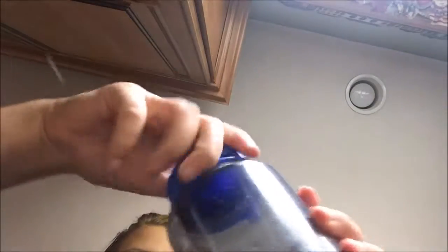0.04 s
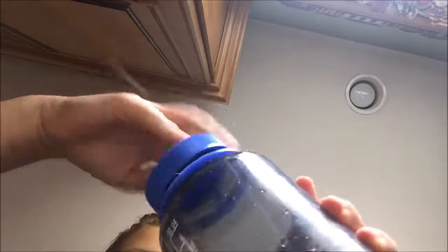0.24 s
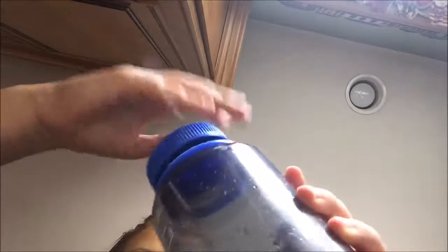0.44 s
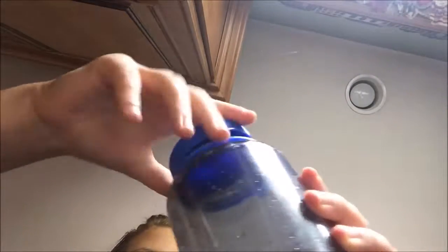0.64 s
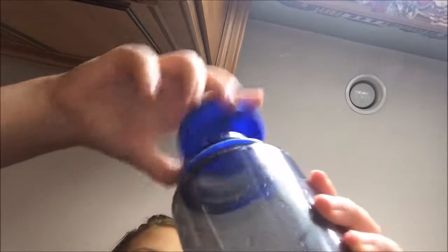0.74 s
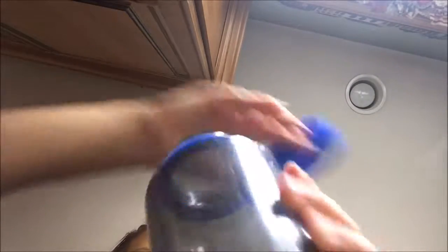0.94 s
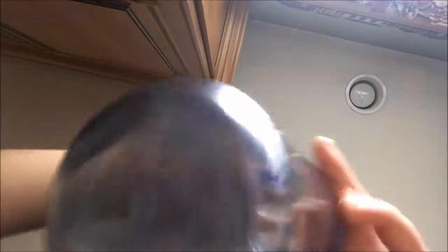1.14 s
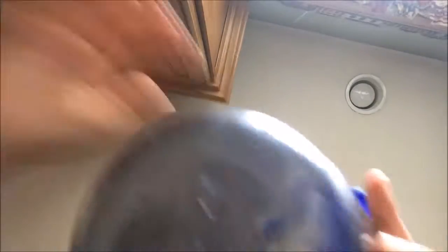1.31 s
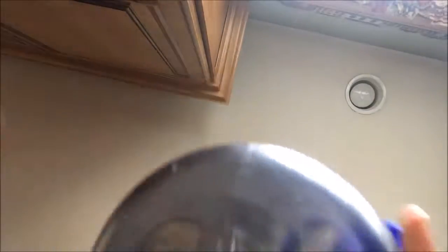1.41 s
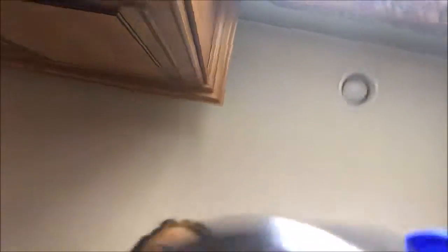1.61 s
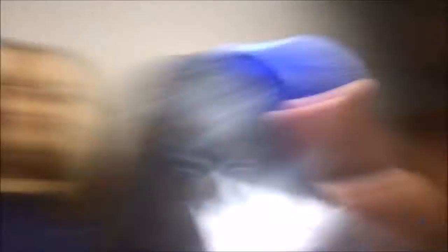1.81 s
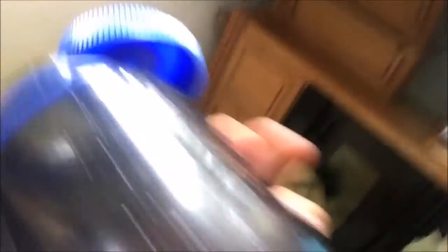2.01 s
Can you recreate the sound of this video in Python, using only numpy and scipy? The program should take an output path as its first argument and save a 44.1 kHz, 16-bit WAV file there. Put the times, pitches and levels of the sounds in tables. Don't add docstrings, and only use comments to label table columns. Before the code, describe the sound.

Close up in a small indoor kitchen, a bottle cap clicks and scrapes along its thread, snaps free, ticks lightly, knocks the bottle wall with a hollow hum, then the recording phone is bumped and dragged.

```python
import sys
import numpy as np
from scipy import signal
from scipy.fft import rfft, irfft, next_fast_len
from scipy.io import wavfile
from scipy.ndimage import uniform_filter1d

SR = 44100
rng = np.random.default_rng(int(sys.argv[2]) if len(sys.argv) > 2 else 0)


def generate_wav(sig):
    pcm = np.round(np.clip(np.atleast_2d(sig).T, -1, 1) * 32767).astype(np.int16)
    wavfile.write(sys.argv[1], SR, pcm)


def attenuation_scalar(level_db):
    decades = np.asarray(level_db, float) / 20
    return 10 ** decades


N = 90449

# (frequency [Hz], level [dB])
AIR_COLOUR = [(30, -19), (70, 10.5), (110, 4.5), (300, 6.5), (700, -2), (2000, -10.5), (6000, -20),
              (16000, -28)]
# (time [s], level [dB])
SCRAPE = [(0, -44.5), (.1, -55.5), (.2, -48), (.27, -45), (.31, -55), (.35, -51), (.41, -50.5), (.45, -59),
          (.5, -47), (.55, -61), (.6, -83.5), (.655, -54), (.665, -39), (.72, -56.5), (.775, -49),
          (.79, -49.5), (.81, -51), (.86, -61.5), (.95, -69)]
# (frequency [Hz], level [dB])
SCRAPE_COLOUR = [(300, -26), (600, -4), (1500, -1.5), (2800, -1), (4000, -25), (6500, -15.5), (10000, -38),
                 (16000, -27.5)]
# (time [s], peak level [dB], struck region [Hz], crack over peak [dB], bottle boom over peak [dB])
TWIST = [(0.023, -23, 2050, -17, -17.5), (0.0312, -35, 2500, -7, -27), (0.0335, -12.5, 1700, -7, -9.5),
         (0.043, -27.5, 4400, -23.5, -51), (0.106, -30.5, 1700, -2, -11), (0.11, -25, 2500, -7, -3),
         (0.122, -24.5, 2300, -21, -40), (0.149, -28.5, 2050, -14, -8), (0.157, -27.5, 6760, -11, -10),
         (0.161, -33.5, 1510, -23, -2), (0.232, -30, 1830, -15.5, -46), (0.236, -20, 1610, -18, -2),
         (0.307, -38.5, 2080, -12.5, -18), (0.321, -34.5, 2800, -8.5, -15), (0.331, -33.5, 1400, -22, -2),
         (0.352, -35, 1420, -12, -22), (0.366, -25, 1470, -34, 2), (0.381, -21.5, 2800, -45.5, -10),
         (0.384, -15.5, 1900, -48, -6), (0.391, -37, 2500, -35, -10.5), (0.401, -16, 1690, -37.5, -9),
         (0.407, -48, 900, -42, -17.5), (0.413, -29, 1375, -49, -10), (0.431, -29.5, 1400, -14.5, -1.5),
         (0.458, -25, 1970, -12, -11), (0.4925, -28.5, 1900, -34, -17), (0.531, -42, 2500, -23.5, -25.5)]
# (frequency [Hz], level [dB], t60 [s])
CAP = [(1035, 3.5, 0.15), (1499, 8, 0.072), (1821, 6.5, 0.04), (2090, 9, 0.026), (2511, 1, 0.081),
       (2636, -14, 0.2), (3613, -9, 0.11), (4220, -1.5, 0.053), (4580, -1, 0.038), (5710, 1, 0.017),
       (6270, -10.5, 0.066), (6290, 4, 0.012)]
# (frequency [Hz], level [dB], t60 [s])
SHUT = [(136, -0.5, 0.084), (200, 11, 0.049), (265, 8.5, 0.021), (317, 2.5, 0.062), (460, -5, 0.026)]
# (frequency [Hz], level [dB])
CRACK = [(1500, -36), (4000, 6.5), (7000, 1.5), (11000, -4.5), (16000, -8.5)]
# (time [s], level [dB])
GRIP = [(.1, -51), (.16, -84), (.172, -32.5), (.19, -58), (.3, -47), (.36, -43), (.42, -30.5), (.46, -44.5),
        (.5, -37.5), (.54, -37), (.58, -53.5), (.65, -61), (.695, -26.5), (.72, -59)]
# (time [s], level [dB])
PALM = [(.29, -66), (.305, -59), (.35, -63.5), (.37, -88)]
# (frequency [Hz], level [dB])
PALM_COLOUR = [(4000, -22), (6500, 5.5), (9000, -12.5), (11200, 1), (13000, -10), (16000, -1)]
# (time [s], level [dB])
SLACK = [(.5, -51), (.58, -46), (.63, -47.5), (.665, -40.5)]
# (time [s], peak level [dB], struck region [Hz], crack over peak [dB], bottle boom over peak [dB])
LOOSE = [
    (.666, -5, 1740, -8, -9),
    (.675, -12.5, 2100, -27.5, -42),
    (.687, -16, 1920, -25, -16.5),
    (.749, -30, 1590, -9.5, -9),
    (.777, -32.5, 2090, -39, -4),
    (.795, -23.5, 1590, -6.5, -9.5),
]
# (time [s], level [dB], rise [s], t60 [s], share by which the note starts flat [ratio])
HUM = [
    (.795, -28, 0.029, 0.25, 0.16),
    (1.073, -39, 0.012, 0.13, 0.03),
    (1.49, -33.5, 0.0029, 0.14, 0),
    (1.576, -41, 0.002, 0.17, 0),
    (1.957, -47.5, 0.0021, 0.17, 0),
    (2.021, -30, 0.031, 0.49, 0.00079),
]
# (time [s], peak level [dB], struck region [Hz], crack over peak [dB], bottle boom over peak [dB])
STRAP = [(.975, -49.5, 6360, -60, -42), (1.026, -34, 2350, -2, -14), (1.0265, -32, 6400, -20, -33),
         (1.039, -31, 1800, -8.5, -9), (1.0395, -28, 4000, -32, -50), (1.158, -46.5, 1810, -39, -24),
         (1.175, -53.5, 1900, -44, -20), (1.231, -35, 1880, -42, -45), (1.243, -40, 2450, -15, -40),
         (1.279, -39, 1590, -5, -4), (1.2795, -32.5, 4100, -17.5, -40), (1.609, -58.5, 2500, -6, -6)]
# (frequency [Hz], level [dB], t60 [s])
LID = [(1634, 9, 0.038), (1960, -0.5, 0.069), (2100, 5.5, 0.042), (2464, -0.5, 0.15), (2770, 2, 0.07),
       (3300, 13, 0.013), (3994, 4.5, 0.025), (4680, 1, 0.042), (6170, -1, .04), (7400, -39, 0.02)]
# (time [s], peak level [dB], struck region [Hz], crack over peak [dB], cavity boom over peak [dB])
BOUNCES = [
    (1.3395, -8, 1500, -32.5, -9),
    (1.3585, -27.5, 1840, -44.5, -29.5),
    (1.387, -22.5, 1380, -34, -25),
    (1.436, -37, 1500, -50, -40),
    (1.491, -40, 1050, -53.5, 6),
    (1.51, -62, 1500, -47, 5),
]
# (frequency [Hz], level [dB], t60 [s])
WALL = [(955.7, 9.5, 0.066), (1500, -10.5, 0.06), (1777, -1.5, 0.065), (1950, 2.5, 0.026),
        (1965, -3.5, 0.05), (2500, 0, 0.029), (2600, -3.5, .05), (2890, -23, 0.011), (2850, -8.5, 0.07),
        (3070, -15, 0.032), (3320, -6.5, 0.039), (3680, -7, 0.028)]
# (frequency [Hz], level [dB], t60 [s])
OPEN = [(289.3, 26, 0.43), (364, 15, 0.06)]
# (time [s], level [dB])
BRUSH = [(1.61, -58), (1.635, -65.5), (1.655, -53), (1.685, -62)]
# (frequency [Hz], level [dB])
BRUSH_COLOUR = [(600, 13), (2000, -0.5), (4300, 0.5), (7000, -9.5), (13000, -9), (16000, -11)]
# (time [s], level [dB])
RUMBLE = [(1.63, -62), (1.66, -46), (1.7, -44), (1.78, -47), (1.85, -45), (1.91, -54), (1.96, -63)]
# (frequency [Hz], level [dB])
RUMBLE_COLOUR = [(25, -18), (50, -11), (82, 1.5), (140, -10), (400, -17), (1500, -43), (3000, -72)]
# (time [s], peak level [dB], frequency [Hz], t60 [s])
THUMPS = [
    (1.657, -45, 980, 0.019),
    (1.676, -44.5, 900, 0.021),
    (1.69, -23, 79.6, 0.15),
    (1.696, -51, 690, 0.0089),
    (1.7312, -23.5, 524, 0.035),
    (1.734, -34.5, 926, 0.017),
    (1.735, -6, 161.8, 0.029),
    (1.795, -38, 94, 0.13),
    (1.839, -20.5, 181.5, 0.088),
    (1.866, -21, 183, 0.021),
]
# (time [s], level [dB])
DRAG = [(1.836, -32.5), (1.845, -39), (1.856, -29.5), (1.868, -27.5), (1.875, -33.5), (1.879, -43),
        (1.912, -49.5), (1.93, -69)]
# (time [s], peak level [dB])
CATCHES = [(1.8365, -16), (1.8405, -35), (1.8438, -13.5), (1.8471, -12), (1.85, -15.5), (1.858, -31),
           (1.862, -18.5), (1.8655, -13.5), (1.8725, -15.5)]
# (frequency [Hz], width [Hz], level [dB])
CASE = [(183, 98, 13.5), (605, 107, 17), (912, 115, 8.5), (1110, 154, 4), (2300, 1600, -11)]
# (time [s], peak level [dB])
TICKS = [(1.891, -44.5), (1.901, -44), (1.905, -46.5), (1.914, -55.5)]
# (frequency [Hz], t60 [s])
KITCHEN = [(200, 0.2), (2000, 0.35), (8000, 0.23), (15000, 0.36)]

AIR_DB, ROOM_DB = -62, -14.5
GRAINS_PER_S, GRAIN_DB, HISS_SHARE = 600, 3.5, 0.7
CONTACT_S, ROUGH_DB = 0.00202, -14.5
SNAP_CYCLES = 9.04
SPREAD_DB = 2
BODY_RISE_S, CRACK_T60 = 0.00026, 0.0058
SLACK_HZ = 118
CAVITY_HZ, SETTLE_S = 296, 0.03
SLIPS_PER_S, SLIP_DB = 1500, 2
WALL_TOP_HZ, CASE_TOP_HZ = 3950, 4770
MIC_LOW_HZ, MIC_TOP_HZ = 94, 15750


def unit(x):
    return x / np.sqrt(np.mean(x ** 2) + 1e-20)


def along(points, hz):
    f, v = np.transpose(points)
    return np.interp(np.log(hz + 1), np.log(f + 1), v)


def level(rows):
    (s, db), t = np.transpose(rows), np.arange(N) / SR
    gate = np.clip(1 + np.minimum(t - s[0], s[-1] - t) / 0.003, 0, 1)
    return attenuation_scalar(np.interp(t, s, db)) * gate


def filtered(x, response):
    m = next_fast_len(N + SR // 2)
    return irfft(rfft(x, m) * response(np.fft.rfftfreq(m, 1 / SR)), m)[:N]


def below(hz, order):
    return lambda f: signal.freqs(*signal.butter(order, hz, analog=True), f)[1]


def above(hz, order):
    return lambda f: (1j * f / (hz + 1j * f)) ** order


def resonant(peaks):
    def response(f):
        total = 0
        for k, (c, w, db) in enumerate(peaks):
            total = total + (-1) ** k * attenuation_scalar(db) * 1j * f * w / (c * c - f * f + 1j * f * w)
        return total
    return response


def noise():
    return rng.standard_normal(N)


def coloured(x, spectrum):
    return unit(filtered(x, lambda hz: attenuation_scalar(along(spectrum, hz))))


def twice(x, response):
    return unit(filtered(filtered(x, response), response))


def grains(per_s, spread_db):
    size = attenuation_scalar(spread_db * rng.exponential(size=N)) * noise()
    return unit(size * (rng.random(N) < per_s / SR))


def smooth_wander(x, width):
    once = uniform_filter1d(x, size=width, axis=-1)
    return unit(uniform_filter1d(once, size=width, axis=-1))


def ring(modes, damp, focus_hz, rough, fall_db_per_oct):
    hz, db, t60 = np.transpose(modes)[:, :, None]
    luck, t = rng.standard_normal((2, len(modes), 1)), np.arange(SR // 4) / SR
    waver = rough * smooth_wander(rng.standard_normal((len(modes), len(t))), 150)
    waver = waver * np.minimum(t / 0.0025, 1)
    distance_oct = np.abs(np.log2(hz / focus_hz))
    gain = attenuation_scalar(db + SPREAD_DB * luck[0] - fall_db_per_oct * distance_oct - 60 * t / (damp * t60))
    tone = np.sin(2 * np.pi * hz * (1 + 0.008 * luck[1]) * t + waver)
    onset = 1 - np.exp(-2 * t * hz)
    x = (gain * tone * (1 + waver) * onset).sum(0)
    return x / np.abs(x).max()


def strikes(events, shell, body, damp, fall_db_per_oct, top_hz, rough, snap):
    out, crack, t = np.zeros(N + SR), np.zeros(N + SR), np.arange(SR // 4) / SR
    u = t[:SR // 50] / CONTACT_S
    crack_shape = attenuation_scalar(-60 * t / CRACK_T60) + 0.068 * attenuation_scalar(-60 * t / 0.063)
    crack_shape = crack_shape * np.minimum(t * 1000, 1)
    for s, db, hz, crack_db, body_db in events:
        touch = attenuation_scalar(ROUGH_DB) * u * np.exp(-u) * rng.standard_normal(len(u))
        touch[round(CONTACT_S * SR / 2)] = 1
        hit = signal.fftconvolve(ring(shell, damp, hz, rough, fall_db_per_oct), touch)[:len(t)]
        swell = np.e * (t * hz * 7 / SNAP_CYCLES) * attenuation_scalar(-60 * t * hz / SNAP_CYCLES)
        hit = hit / np.abs(hit).max() + snap * swell * np.sin(2 * np.pi * hz * t)
        boom = ring(body, 0.59, 400, rough / 5, fall_db_per_oct=5.5) * (1 - np.exp(-t / BODY_RISE_S))
        at = slice(round(s * SR), round(s * SR) + len(t))
        out[at] += attenuation_scalar(db) * (hit / np.abs(hit).max() + attenuation_scalar(body_db) * boom)
        crack[at] += attenuation_scalar(db + crack_db) * crack_shape
    return filtered(out[:N], below(top_hz, order=8)) + crack[:N] * coloured(noise(), CRACK)


def still_air():
    return attenuation_scalar(AIR_DB) * coloured(noise(), AIR_COLOUR)


def thread_scrape():
    cap = resonant([(hz, 260, db / 2 - 1.8 * np.log2(hz / 1000)) for hz, db, _ in CAP[:9]])
    rub = twice(grains(GRAINS_PER_S, GRAIN_DB), cap)
    hiss = coloured(noise() + HISS_SHARE * grains(GRAINS_PER_S, GRAIN_DB), SCRAPE_COLOUR)
    return level(SCRAPE) * unit(rub + 0.74 * hiss)


def thread_clicks():
    return strikes(TWIST, CAP, SHUT, damp=0.29, fall_db_per_oct=8.5, top_hz=8485, rough=0.43, snap=0.53)


def grip_shake():
    return level(GRIP) * twice(noise(), resonant([(hz, 75, db / 2) for hz, db, _ in SHUT]))


def palm_slide():
    return level(PALM) * coloured(noise(), PALM_COLOUR)


def slack_bottle():
    return level(SLACK) * twice(noise(), resonant([(SLACK_HZ, 45, 0)]))


def cap_snaps_free():
    return strikes(LOOSE, CAP, SHUT, damp=0.42, fall_db_per_oct=4.5, top_hz=9000, rough=0.18, snap=1.65)


def cavity_hum():
    out, t = np.zeros(N + SR), np.arange(SR // 2) / SR
    drift = 1 + 0.17 * smooth_wander(noise(), 600)
    for s, db, rise, t60, flat in HUM:
        phase = 2 * np.pi * CAVITY_HZ * np.cumsum(1 - flat * np.exp(-t / SETTLE_S)) / SR
        envelope = attenuation_scalar(db - 60 * t / t60) * (1 - np.exp(-t / rise))
        out[round(s * SR):][:len(t)] += envelope * np.sin(phase)
    return out[:N] * drift


def strap_ticks():
    return strikes(STRAP, LID, SHUT, damp=0.45, fall_db_per_oct=11, top_hz=9000, rough=0.35, snap=0.35)


def cap_bounces():
    return strikes(BOUNCES, WALL, OPEN, damp=0.68, fall_db_per_oct=10.5, top_hz=WALL_TOP_HZ,
                   rough=0.49, snap=0.24)


def finger_brush():
    return level(BRUSH) * coloured(noise(), BRUSH_COLOUR)


def handling_rumble():
    return level(RUMBLE) * coloured(noise(), RUMBLE_COLOUR)


def case_thumps():
    out, t = np.zeros(N + SR), np.arange(SR // 8) / SR
    for s, db, hz, t60 in THUMPS:
        envelope = attenuation_scalar(db - 60 * t / t60) * (1 - np.exp(-2 * t * hz))
        out[round(s * SR):][:len(t)] += envelope * 2 * np.sin(2 * np.pi * hz * t)
    return out[:N]


def impulses(events, boost_db):
    out = np.zeros(N)
    for s, db in events:
        out[round(s * SR)] = attenuation_scalar(db + boost_db)
    return out


def case_drag():
    body, dull = resonant(CASE), below(CASE_TOP_HZ, order=2)
    case = lambda f: body(f) * dull(f)
    drag = unit(filtered(grains(SLIPS_PER_S, SLIP_DB) + 0.5 * noise(), case))
    return level(DRAG) * drag + filtered(impulses(CATCHES, 13), case)


def last_slips():
    return filtered(impulses(TICKS, 21.5), resonant([(3350, 1000, 0.02), (6000, 1100, 0.0048)]))


def kitchen(x):
    hz, t, z = signal.stft(rng.standard_normal(SR // 2), SR, nperseg=256)
    tail = signal.istft(z * attenuation_scalar(-60 * t / along(KITCHEN, hz)[:, None]), SR, nperseg=256)[1]
    return signal.fftconvolve(np.pad(x, (200, 0)), tail / np.linalg.norm(tail))[:N]


def scene():
    friction = thread_scrape() + grip_shake() + palm_slide() + slack_bottle()
    hits = thread_clicks() + cap_snaps_free() + strap_ticks() + cap_bounces()
    bottle = filtered(friction + hits, above(MIC_LOW_HZ, order=4))
    phone = finger_brush() + handling_rumble() + case_thumps() + case_drag() + last_slips()
    handled = filtered(phone, above(40, order=2))
    return (still_air() + bottle + attenuation_scalar(ROOM_DB) * kitchen(bottle) + cavity_hum() + handled)[None]


def roll_off(x):
    return signal.sosfilt(signal.butter(12, 16490, fs=SR, output="sos"), x)


def record(dry):
    mix = filtered(dry[0], lambda f: f < MIC_TOP_HZ)[None]
    return roll_off(mix)


dry = scene()
out = record(dry)
generate_wav(out)
```